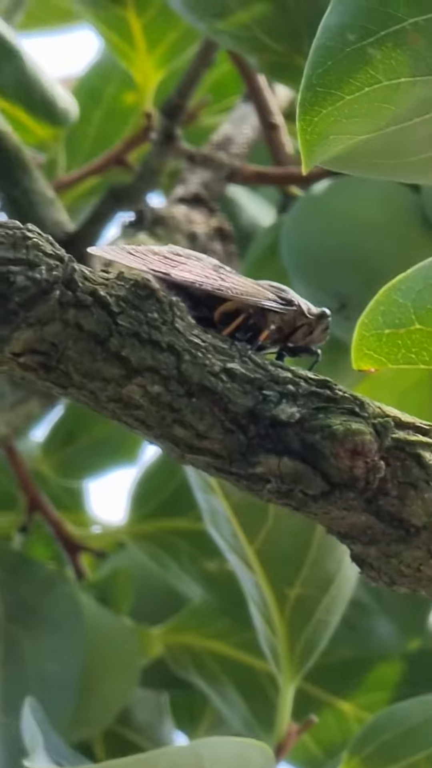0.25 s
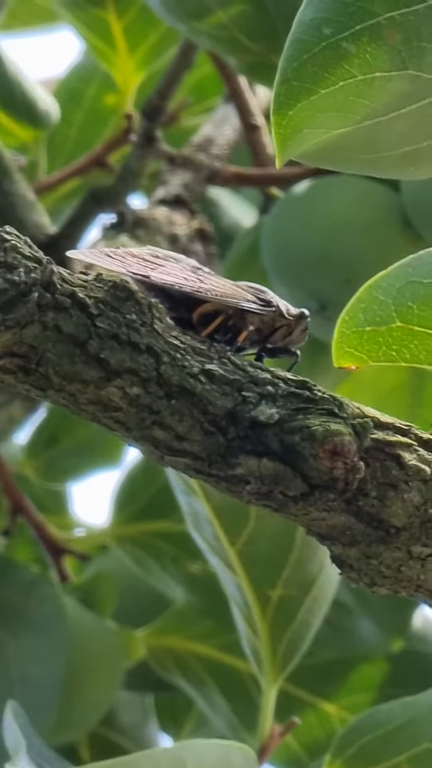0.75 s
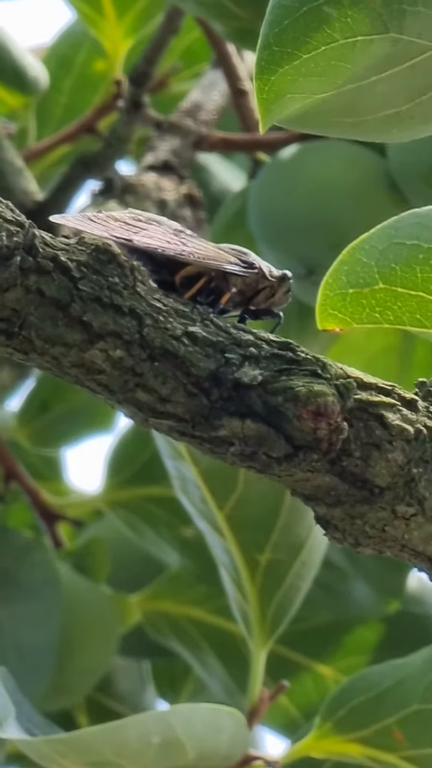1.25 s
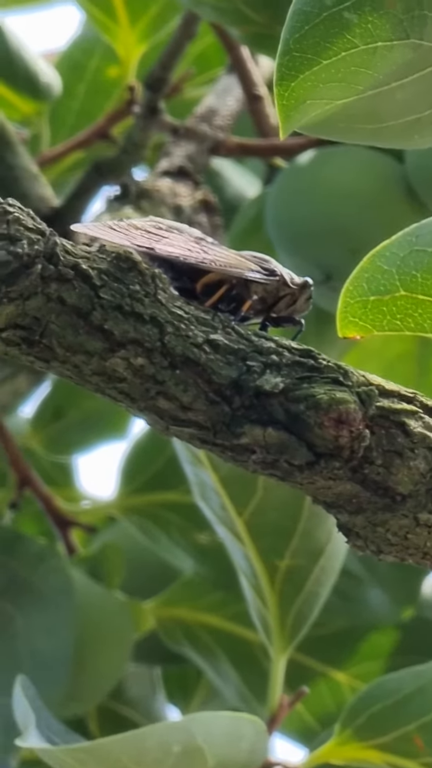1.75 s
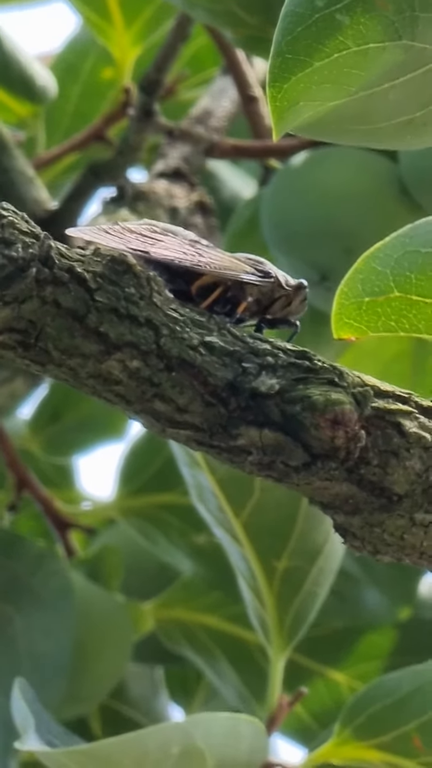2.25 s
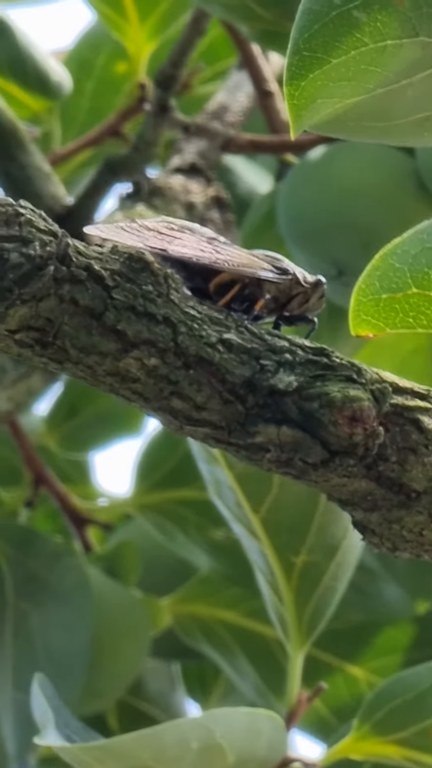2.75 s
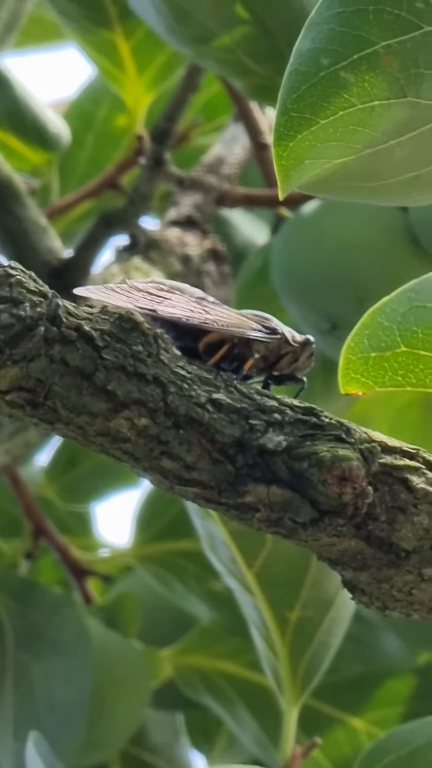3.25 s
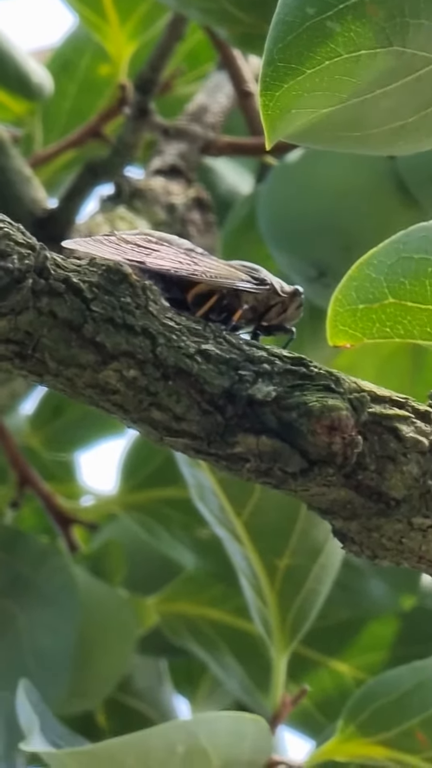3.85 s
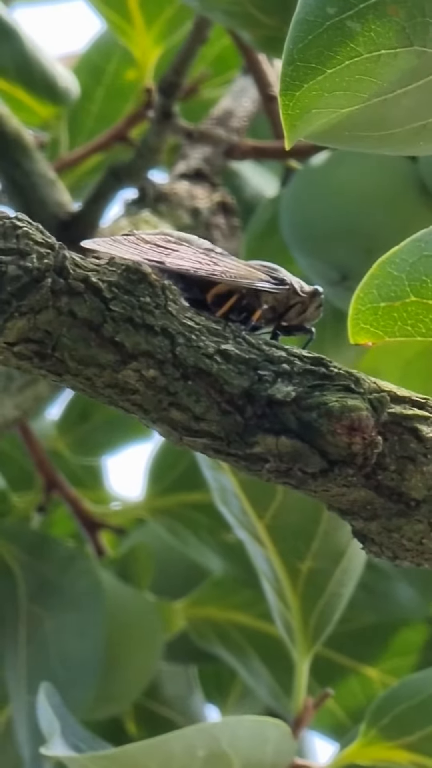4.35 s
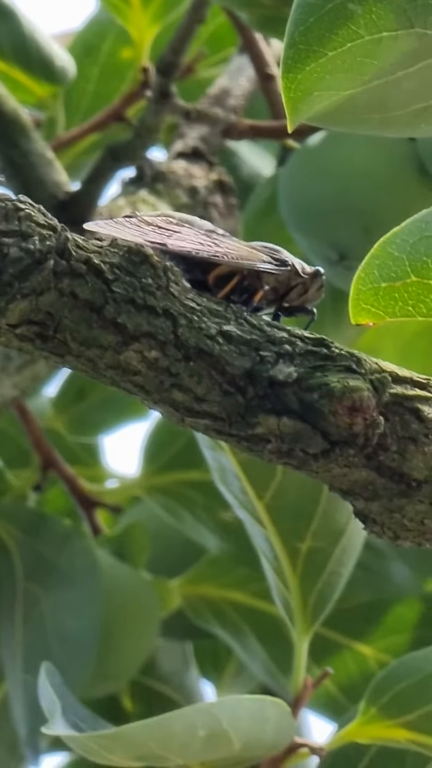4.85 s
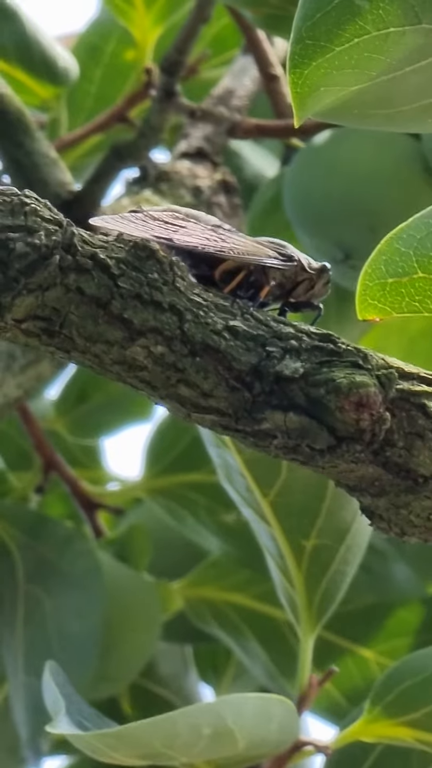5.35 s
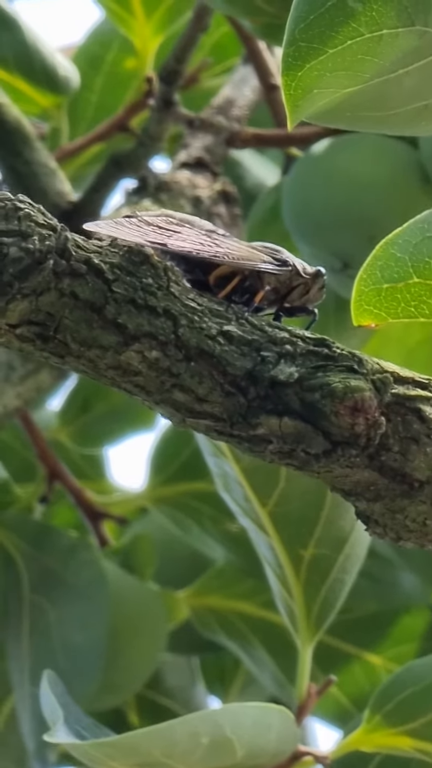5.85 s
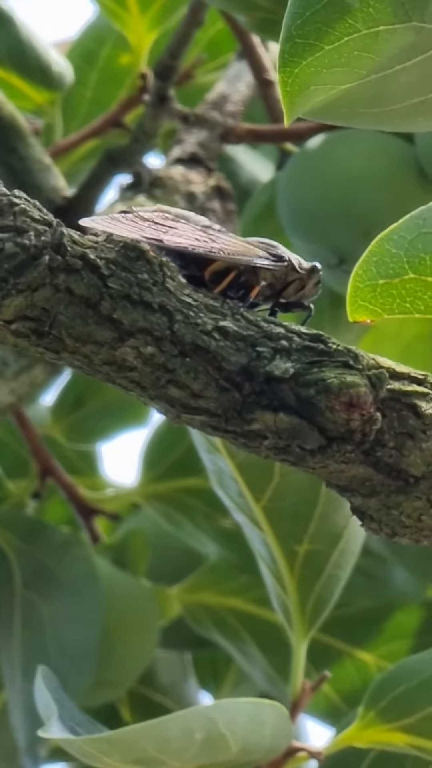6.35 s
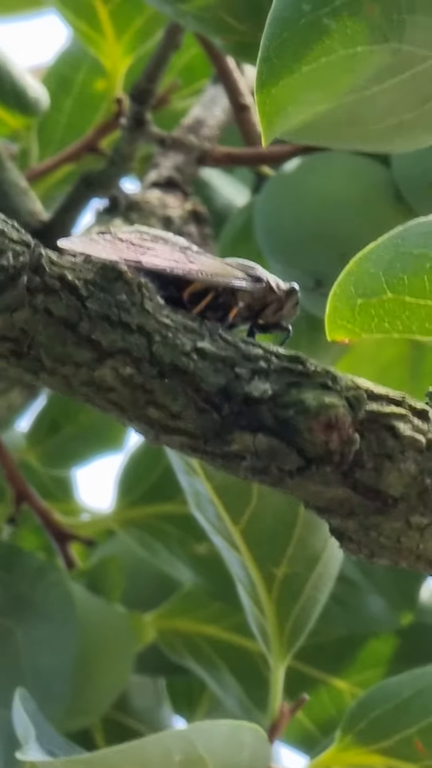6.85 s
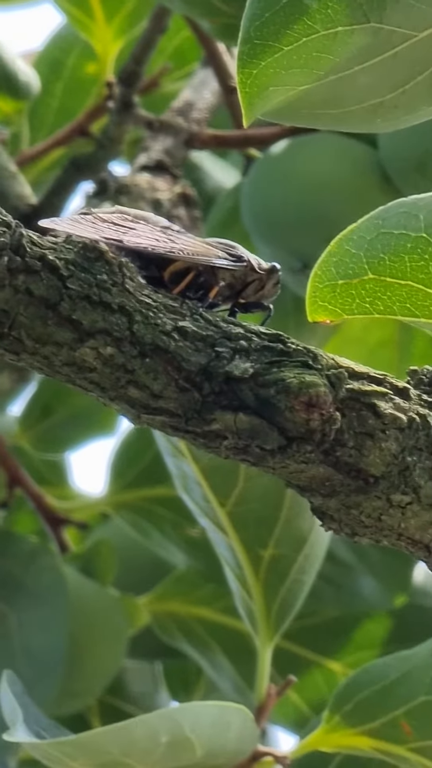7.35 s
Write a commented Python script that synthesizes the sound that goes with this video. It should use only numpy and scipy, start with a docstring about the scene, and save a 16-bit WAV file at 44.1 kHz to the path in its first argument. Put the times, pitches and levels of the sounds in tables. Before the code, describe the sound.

After a split second of silence, a single cicada is already in full song on a tree branch, about an arm's length away. The sound is a loud, shrill, dry buzz made of tiny ringing clicks that pulse about fifty times a second, with a thin throbbing whine and a bright sizzle filling the gaps. The pulse is very slightly slower at first and settles within a second or two. It then holds an even pitch and loudness, with almost no low end. At about 5.4 seconds the rhythm stumbles briefly without breaking. Around 6.8 seconds a soft gust brushes the microphone with a barely audible low rumble, and a smaller slip in the rhythm follows at about 7.3 seconds. A very faint outdoor hiss lies far beneath. The buzz continues at full strength to the end, at about 7.6 seconds.

```python
"""After an instant of silence a cicada is singing on a branch, an arm's length from two microphone ports.
Its muscles pull the ribbed tymbals in, a little slowly at first, then about 52 times a second. The ribs
buckle one after another in short ringing clicks with faint echoes; abdomen, wings and bark add narrow
resonances. Faint background hiss lies underneath and a limiter holds the peaks. The rhythm slips at 5.4 s,
a soft gust brushes the ports at 6.8 s, and a smaller slip follows just before the end."""
import sys
import numpy as np
from scipy import signal
from scipy.fft import rfft, irfft
from scipy.io import wavfile
from scipy.ndimage import uniform_filter1d, minimum_filter1d

SR = 44100
rng = np.random.default_rng(int(sys.argv[2]) if len(sys.argv) > 2 else 0)


def output_pcm(signal):
    """Save a mono or channel-first signal as 16-bit PCM at the path in sys.argv[1].

    Samples are clipped to [-1, 1] before scaling.
    """
    pcm = np.clip(np.atleast_2d(signal).T, -1, 1) * 32767
    wavfile.write(sys.argv[1], SR, np.round(pcm).astype(np.int16))


N = 335160

# Stumbles in the rhythm: t/s, jump/cycles
RHYTHM_SLIPS = [(5.38, .265), (7.25, -.08)]
def muscle_cycles(t, rate_hz=51.811, slow_hz=1.267, settle_s=.962, slip_s=.08):
    """The song's clock, in cycles: the muscle starts a little slow, settles to its rate and slips twice."""
    turns = .156 + rate_hz * t - slow_hz * settle_s * (1 - np.exp(-t / settle_s))
    return turns + sum(jump * np.clip((t - at) / slip_s + .5, 0, 1) for at, jump in RHYTHM_SLIPS)


# Clicks of one cycle and their faint echoes: place/cycles, f/Hz, level/dB
CYCLE_CLICKS = [(.1, 6500, -18), (.1, 8270, -6), (.1, 13100, -22.5), (.15, 5800, -10), (.16, 8500, -15),
                (.17, 3940, -21), (.17, 4900, -18), (.19, 7300, -16), (0.261, 6000, -15), (.3, 8300, -5.5),
                (.36, 4900, -18), (.38, 8400, -20), (.52, 7300, -15.5), (.54, 13300, -23), (.59, 6500, -10),
                (.6, 10100, -21.5), (.61, 12700, -21.5), (.63, 5830, -10.5), (.66, 4040, -19),
                (.66, 4900, -15.5), (.67, 9700, -23), (.69, 6400, -22), (.75, 8200, -7), (.75, 13500, -24),
                (.77, 6800, -13.5), (.81, 4330, -20.5), (0.821, 6000, -14.5), (.83, 9500, -18),
                (.85, 4870, -18), (.87, 6600, -10.5), (.89, 13100, -28), (.92, 8180, -10), (.95, 5730, -5),
                (.95, 12900, -20), (.98, 9560, -18.5), (.99, 3970, -16)]
# Level ride on the clicks near 8.5 kHz: t/s, level/dB
EDGE_RIDE = [(2.0, -0.9), (4.0, 0.1), (6.6, -1.5)]
# Stereo image at the ports: f/Hz, click level right minus left/dB, right lag/rad
STEREO_IMAGE = [(4230, -45, 0.3), (4900, 0.5, 0), (5800, -7, 0.3), (6840, 2, 0.1), (7460, 1.5, 1.5),
                (8280, 2.5, .5), (9350, 10, 0), (9200, 7, 2), (11600, 3, 0.98), (13130, 11, 1.3),
                (14630, 21, 2)]
def tymbal_clicks(turns, jitter_ms=.135, pull_jitter_ms=.059, scatter_db=.55, pull_db=.33, detune=.013):
    """The clicks of the buckling ribs and their faint echoes each ring out in about a millisecond."""
    out, n = np.zeros((2, N + 512)), np.arange(150)
    cycles = np.arange(1, int(turns[-1]) - 1)
    # a later or harder pull moves all clicks of a cycle
    pull_late, pull_force = rng.standard_normal((len(cycles), 2)).T[:, :, None]
    port_hz, port_db, port_lag = np.transpose(STEREO_IMAGE)
    for place, hz, left_db in CYCLE_CLICKS:
        late, soft, tune, skew = rng.standard_normal((len(cycles), 4)).T[:, :, None]
        right_db = left_db + np.interp(hz, port_hz, port_db)
        right_lag = np.interp(hz, port_hz, port_lag) + .28 * skew
        tau = np.clip(1.9 / hz, .26e-3, .38e-3) * SR  # ring time: 1.9 periods, kept to 0.26-0.38 ms
        onset = np.interp(cycles + place, turns, np.arange(N))[:, None] - 2 * tau  # peaks at its place
        onset = onset + (jitter_ms * late + pull_jitter_ms * pull_late) * SR / 1000
        age = n + 1 - onset % 1
        edge_db = np.interp(onset / SR, *np.transpose(EDGE_RIDE)) * (abs(hz - 8500) < 500)
        accent = undb(edge_db - scatter_db * soft + pull_db * pull_force)
        envelope = accent * (age / tau / 2) ** 2 * np.exp(2 - age / tau)
        phase = 2 * np.pi * hz * (1 + detune * tune) * age / SR
        for ear, db, lag in ((0, left_db, 0), (1, right_db, right_lag)):
            out[ear, onset.astype(int) + 1 + n] += undb(db) * envelope * np.sin(phase - lag)
    return out[:, :N]


# Peaks and notches of abdomen, wings and bark: f/Hz, width/Hz, left level/dB, right level/dB
BODY_EQ = [(2883, 40, -14, -28.5), (3210.0, 191, -17, -26.5), (3410.0, 85, 14, 14), (3408, 54, -15, -0.5),
           (3753, 40, -8.5, -6), (3845, 137, 8.5, 15.5), (4060, 58, -7.5, 5), (4188, 80, 12, 15.5),
           (4347, 54, -10.5, -21), (4400, 274, -1.5, -6), (4940, 87, 9.5, 10), (4960, 260, -9, 11.5),
           (5120, 550.0, 0, -7.5), (5926, 210, -1, 8), (6090, 99, 2.7, -12.5), (6190, 140, 6.5, 7),
           (6930, 57, 4.5, 12.5), (7220, 600, -0.5, 3), (7490, 84, -3, -3), (8070, 174, 7, -6.5),
           (8300, 117, 5.5, 7), (8740, 52, -4.5, 3.5), (8500, 87, 0, -8), (9120, 330, 0.5, 12),
           (9180, 70, -13, -9), (9840, 215, 8.5, 6), (11040, 1540, 10, 4.2), (14130, 490, 5.5, -2.5),
           (15650, 2440, 11.5, 8.5)]
def body_resonance(x, echo_ms=1.52, feedback=.24):
    """Resonances lift or cut narrow bands at each port; the sound then bounces between bark and leaves."""
    f, response = np.fft.rfftfreq(N, 1 / SR) + 1, 1
    for hz, width, left_db, right_db in BODY_EQ:
        root_gain = undb([[left_db / 2], [right_db / 2]])
        off_centre = 1j * (f - hz ** 2 / f) / width
        response = response * (off_centre + root_gain) / (off_centre + 1 / root_gain)
    echoes = 1 / (1 - feedback * np.exp(-2j * np.pi * f * echo_ms / 1000))
    return irfft(rfft(x) * response * echoes, N)


# Sustained tones: f/Hz, wander/Hz, left level/dB, right level/dB, throb depth/0-1, crest/cycles
WHINE_TONES = [(4903, 18, -20.5, -26, 0.3, 0), (6872, 25.5, -35, -17.5, 0.22, 0.99),
               (5975, 40, -17.5, -28.5, 0.8, 0.82), (3917, 36.9, -31, -36.5, 0.27, .0),
               (4240, 34.6, -29.5, -47.5, 0.24, 1), (3440, 29.9, -39, -40, 0.2, 0.83),
               (6150, 25.2, -53, -28.5, 0, 0.64), (8530, 61, -31, -21, 0.7, 0.29)]
def abdomen_whine(turns):
    """Ribs buckle in step with the ringing abdomen, so a few tones hold on and throb with the cycle."""
    out = 0
    for hz, wander_hz, left_db, right_db, depth, crest in WHINE_TONES:
        phase = 2 * np.pi * np.cumsum(hz + wander_hz * level(drift(120), 0)) / SR
        throb = 1 + depth * np.cos(2 * np.pi * (turns - crest))
        out = out + undb([[left_db], [right_db]]) * throb * np.sin(phase - [[0], [stereo_lag(hz)]])
    return out


# Sizzle between the clicks: f/Hz, level/dB
RUSTLE_EQ = [(1500.0, -89), (2400.0, -37.5), (2900.0, -17), (3400.0, -14.5), (3900.0, -17), (5000.0, -7),
             (6000.0, -1), (7400.0, -3.5), (8500.0, 0), (10500.0, -19.5), (13000.0, -5.5), (14500.0, -23),
             (16000.0, -20)]
def tymbal_rustle(turns, rest_place=.41, duck_db=-5):
    """Small buckles and scattered sound fill the gaps, and duck while the muscles rest."""
    lull = np.exp(8.3 * (np.cos(2 * np.pi * (turns - rest_place)) - 1))
    left, right = stereo_noise(RUSTLE_EQ, correlation=.88) * undb(duck_db * lull)
    lag = stereo_lag(np.fft.rfftfreq(N, 1 / SR))
    return np.array([left, irfft(rfft(right) * np.exp(-1j * lag), N)])


# Dark background hiss: f/Hz, level/dB
HISS_EQ = [(12, -35), (20, -13), (70, 2), (204, -7.5), (298, -3.5), (742, -11), (1130, -8.5), (1370, -13),
           (2300, -14.5), (2990, -52), (5060, -120)]
def background_hiss(t, bed_db=-54, fade_db_per_s=.5):
    """Faint background hiss with a slight random level flutter, slowly fading."""
    bed = stereo_noise(HISS_EQ, correlation=.34)
    return bed * undb(bed_db - fade_db_per_s * t + 2.2 * drift(14) + [[-1], [1]])


# Low wind rumble: f/Hz, level/dB
WIND_EQ = [(15, -4), (35, -3), (70, 6), (200, -8), (500, -40)]
def port_wind(t, bed_db=-71.5, gust_db=12, gust_at_s=6.77, gust_width_s=.31):
    """A little wind rumbles on each port, fluttering and swelling into one gust."""
    swell_db = gust_db * np.exp(-((t - gust_at_s) / gust_width_s) ** 2)
    rumble = stereo_noise(WIND_EQ, correlation=0)
    return rumble * undb(bed_db + swell_db + 5 * drift(9.4) + [[-1.5], [1.5]])


def stereo_lag(hz):
    """Radians by which the song at the right port trails the left."""
    port_hz, _, lag = np.transpose(STEREO_IMAGE)
    return np.interp(hz, port_hz, lag)


def stereo_noise(eq, correlation):
    """Two channels of coloured noise that share a part, at unit rms."""
    hz, db = np.transpose(eq)
    mid, side = rng.standard_normal((2, N))
    pair = np.sqrt(1 + correlation) * mid + np.sqrt(1 - correlation) * side * [[1], [-1]]
    f = np.fft.rfftfreq(N, 1 / SR) + 1
    colour = undb(np.interp(np.log(f), np.log(hz), db))
    return level(irfft(rfft(pair) * colour, N), 0)


def drift(rate_hz):
    """Smooth random modulation: sample and hold, slewed twice."""
    hold = int(SR / rate_hz)
    steps = np.repeat(rng.standard_normal(N // hold + 1), hold)
    return uniform_filter1d(uniform_filter1d(steps, hold), hold)[:N]


def undb(db):
    """Decibels to gain."""
    return 10 ** (np.asarray(db) / 20)


def level(x, db):
    """Scale to an rms level."""
    return x * undb(db) / np.sqrt(np.mean(x ** 2))


def scene():
    """The cicada up front, hiss and wind far beneath it."""
    t = np.arange(N) / SR
    turns = muscle_cycles(t)
    low_cut = signal.butter(4, 3100, "high", fs=SR, output="sos")
    clicks = signal.sosfilt(low_cut, tymbal_clicks(turns))
    song = body_resonance(clicks + undb(-16.5) * tymbal_rustle(turns)) + abdomen_whine(turns)
    return level(song, -10.5) + background_hiss(t) + port_wind(t)


def record(dry, ceiling=.94, silence_s=.0735, high_cut_hz=15700):
    """The lopsided microphone turns the throb into a faint hum; a quick limiter holds the loudest clicks."""
    hum = signal.sosfilt(signal.butter(1, 350, fs=SR, output="sos"), dry ** 2 - np.mean(dry ** 2))
    gain = np.minimum(1, ceiling / (np.abs(dry).max(axis=0) + 1e-9))
    gain = minimum_filter1d(gain, size=61)  # hold around each peak
    gain = uniform_filter1d(uniform_filter1d(gain, size=31), size=31)  # ease in and out
    gate = np.arange(N) > silence_s * SR
    high_cut = signal.ellip(12, .2, 70, high_cut_hz, fs=SR, output="sos")
    return signal.sosfilt(high_cut, (dry * gain + .022 * hum) * gate)


dry = scene()
out = record(dry)
output_pcm(out)
```